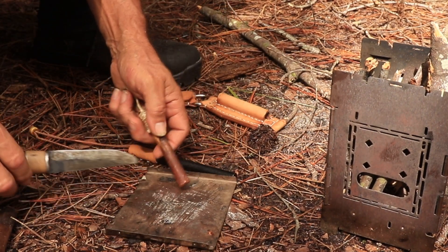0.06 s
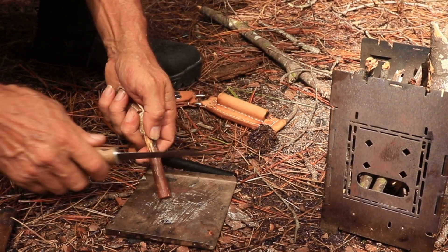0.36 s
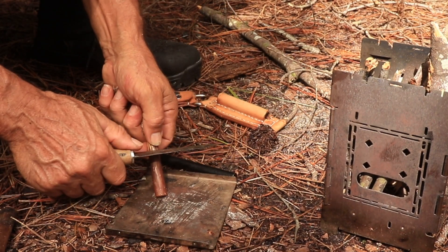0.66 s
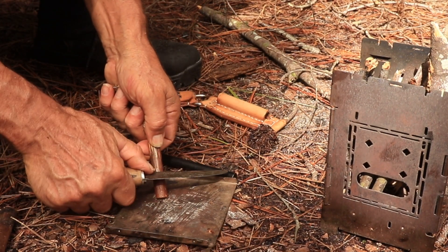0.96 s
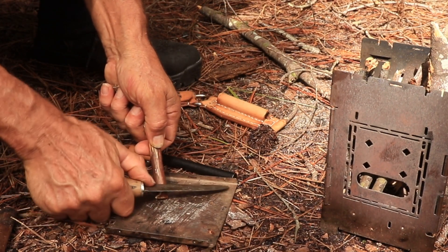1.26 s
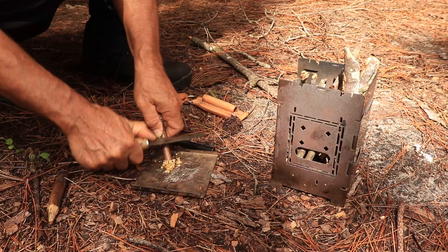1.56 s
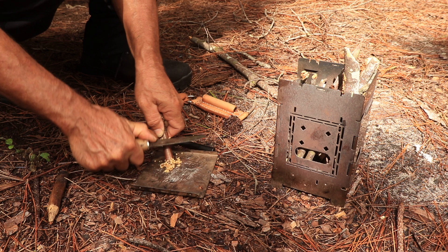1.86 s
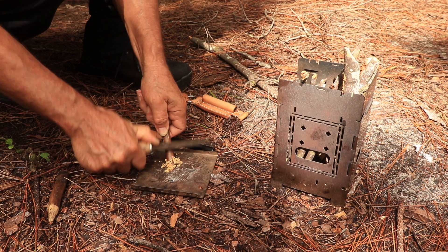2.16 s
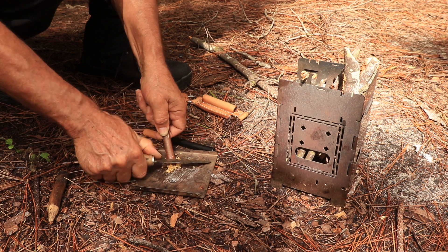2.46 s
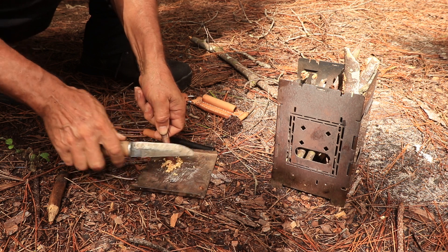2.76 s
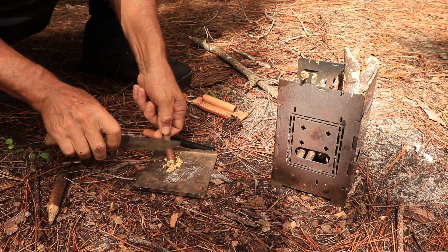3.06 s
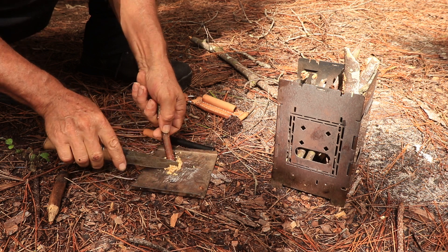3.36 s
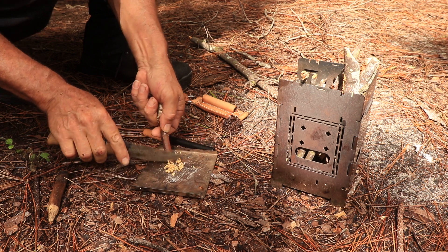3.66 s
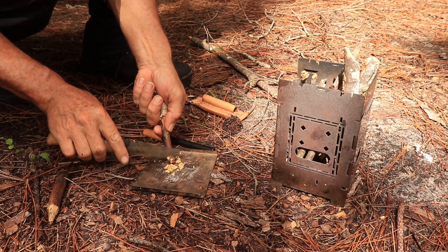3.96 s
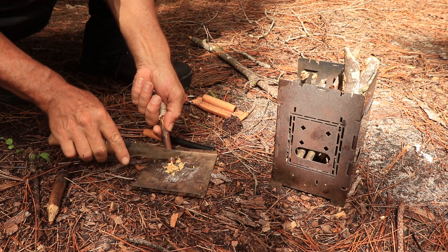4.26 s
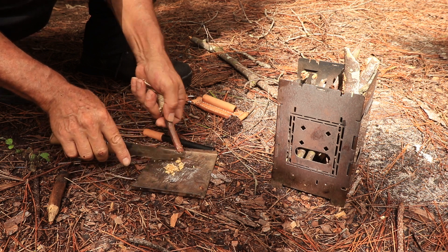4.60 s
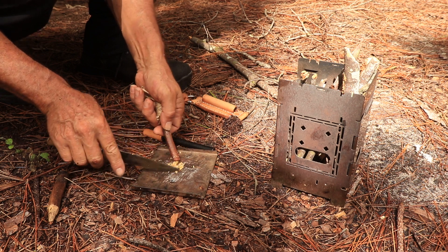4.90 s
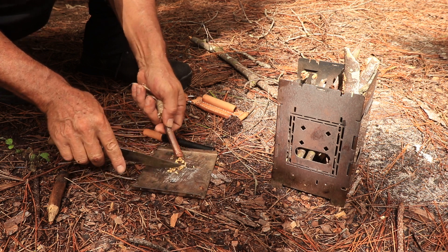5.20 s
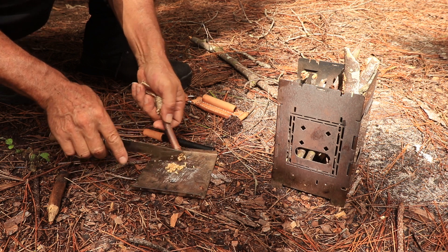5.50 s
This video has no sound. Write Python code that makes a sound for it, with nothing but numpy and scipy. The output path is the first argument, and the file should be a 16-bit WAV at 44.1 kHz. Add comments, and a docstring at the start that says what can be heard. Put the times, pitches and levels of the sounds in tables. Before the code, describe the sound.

Close, chattering knife scrapes and sharp clicks on a metal rod, followed by soft taps and one small clank over faint outdoor air.

```python
"""Shaving a fire-starter rod in the forest

Close to the microphone, a knife works a rod that stands on a steel plate on a quiet forest floor.
The blade rings as it is picked up, then sticks and slips through six hard, chattering strokes, with
light, gritty slides back between them. Afterwards the rod tip taps the plate and pushes the shavings
together. Rod and plate colour every scrape and knock, and the ground thuds softly underneath."""
import sys
import numpy as np
from scipy import signal
from scipy.fft import rfft, irfft, next_fast_len
from scipy.io import wavfile
from scipy.ndimage import uniform_filter1d, minimum_filter1d, map_coordinates

SR = 44100
rng = np.random.default_rng(int(sys.argv[2]) if len(sys.argv) > 2 else 0)


def store_pcm(level_fs):
    """Save levels as 16-bit WAV."""
    pcm = np.round(np.clip(level_fs, -1, 1) * 32767).astype(np.int16)
    wavfile.write(sys.argv[1], SR, np.atleast_2d(pcm).T)


N = 253134


def amp(db):
    """Decibels to gain."""
    return 10 ** (np.asarray(db) / 20)


def unit(x):
    """Scale to rms 1."""
    return x / np.sqrt(np.mean(x ** 2) + 1e-20)


def filtered(x, response):
    """Pass x through a complex response of frequency."""
    size = next_fast_len(len(x) + 8192)
    return irfft(rfft(x, size) * response(np.fft.rfftfreq(size, 1 / SR)), size)[:len(x)]


def noise(spectrum, size=N):
    """Noise of rms 1, coloured by rows of frequency_hz, level_db."""
    knots_hz, db = np.transpose(spectrum)
    colour = lambda hz: amp(np.interp(np.log(hz + 1), np.log(knots_hz), db))
    return unit(filtered(rng.standard_normal(size), colour))


def wobble(rate_hz, size=N):
    """A smooth random curve with rate_hz knots a second."""
    knots = rng.standard_normal(int(size * rate_hz / SR) + 4)
    return map_coordinates(knots, [np.arange(size) * rate_hz / SR])


def resonance(hz, centre, width):
    """Response of one damped mode, 1 at its centre."""
    return 1j * hz * width / (centre ** 2 - hz ** 2 + 1j * hz * width)


def add(track, start_s, sound):
    """Mix a sound into the track at start_s."""
    i = max(round(start_s * SR), 0)
    track[i:i + len(sound)] += sound[:N - i]


# The forest air all around the microphone: frequency_hz, level_db
AIR_SPECTRUM = [(12, -20), (20, -17), (52, -1), (187, -2.5), (310, -5), (499, -6), (698, -9), (976, -9.5),
                (1190, -10), (1660, -12.5), (1810, -11), (2020, -14), (3070, -16.5), (14300, -24.5),
                (16000, -27)]
def forest_air(level_db=-48, waver_db=0.26):
    """Still air among the trees over a faint, even hiss."""
    return amp(level_db + waver_db * wobble(16)) * noise(AIR_SPECTRUM)


def forest_echo(x, near_t60_s=0.081, near_db=-20, far_t60_s=0.39, far_db=-40):
    """The ground and a steel stove nearby add a short echo; trunks farther off, a faint longer one."""
    t = np.arange(SR // 2) / SR
    near, far = (rng.standard_normal(len(t)) * amp(-60 * t / t60_s) * (t > .002)
                 for t60_s in (near_t60_s, far_t60_s))
    tail = amp(near_db) * near / np.linalg.norm(near) + amp(far_db) * far / np.linalg.norm(far)
    return x + signal.fftconvolve(x, tail)[:N]


# The blade ringing as it is picked up or slips free: start_s, level_db
BLADE_TINGS = [(.002, -35), (.045, -35.5), (1.808, -46), (2.33, -53), (2.592, -44)]
# Modes of the free blade: pitch_hz, level_db, t60_s
BLADE_MODES = [(1380, 2, 0.13), (1624, 10, 0.072), (1790, -24, 0.083), (1996, 1, 0.13), (3680, 3, 0.085),
               (3960, -2, 0.14), (4330, 2, 0.14), (4200, -8, 0.17), (4590, -6.5, 0.26), (5250, -8.5, 0.19),
               (5930, -14, 0.29), (6400, -9, 0.14), (7260, -7, 0.15), (7540, -16, .11), (7770, -1.5, 0.17),
               (8000, -7, 0.15), (9440, -3, 0.2), (10000, -13, .12), (12200, -16, .12)]
# The rod tip knocking on the plate: start_s, level_db
PLATE_CLANKS = [(4.9368, -12), (4.9432, -21)]
# Modes of the steel plate: pitch_hz, level_db, t60_s
PLATE_MODES = [(958, 4.5, 0.046), (1510, -7.5, 0.098), (2256, -7, 0.046), (3127, -8, 0.16),
               (3455, -3, 0.035), (4130, -11.5, 0.14), (6460, -15.5, 0.13), (7600, -35, 0.22),
               (8560, -21, 0.11), (9600, -30, 0.1)]
def ringing_steel(blows, modes):
    """Free steel rings in its own modes, at new strengths for each blow."""
    out, t = np.zeros(N), np.arange(SR // 3) / SR
    attack = 1 - np.exp(-t / 0.00027)
    for start_s, db in blows:
        ring = sum(amp(mode_db + rng.normal(0, 2.7) - 60 * t / t60_s)
                   * np.sin(2 * np.pi * (hz * t + rng.random())) for hz, mode_db, t60_s in modes)
        add(out, start_s, amp(db) * ring * attack)
    return out


# Modes of rod and plate held together: pitch_hz, width_hz, level_db
ROD_MODES = [(676, 57, 2.5), (920, 24, -3), (1118, 140, -11), (1206, 56, 1), (1283.4, 40, 1),
             (1440, 53, -7.5), (1636, 65, -5), (1853, 70, 2.5), (2115, 18, -17), (2440, 130, -4.5),
             (2565, 90, -2.5), (2710, 100, -9), (3090, 41, -13), (3240, 280, -5.5), (3710, 28, -2),
             (4300, 92, -20), (4286, 114, 0), (4300, 50, -35)]
def rod_body(force, direct, low_hz=750, high_hz=4500):
    """A force heard through the modes of rod and plate, plus a direct share, within a steep-edged band."""
    def response(hz):
        modes = sum(amp(db) * resonance(hz, centre, width) for centre, width, db in ROD_MODES)
        highpass = signal.freqs(*signal.butter(4, 1, 'high', analog=True), hz / low_hz)[1]
        lowpass = signal.freqs(*signal.butter(4, 1, 'low', analog=True), hz / high_hz)[1]
        return (direct + modes) * highpass * lowpass
    return filtered(force, response)


# Treble modes of the gripped blade: pitch_hz, width_hz, level_db
EDGE_MODES = [(3150, 61, -3), (3600, 59, -11), (4360, 194, 9), (5760, 160, -1), (6120, 260, -0.5),
              (6950, 260, -5.5), (7650, 64, 5), (8300, 220, -1.5), (9500, 310, -3.5), (10870, 410, -3)]
def blade_edge(friction, direct=0.5):
    """Fine friction coloured by the blade's treble resonances."""
    modes = lambda hz: sum(amp(db) * resonance(hz, centre, width) for centre, width, db in EDGE_MODES)
    return filtered(friction, lambda hz: direct + modes(hz))


# The forest floor thudding under the plate: frequency_hz, level_db
THUD_SPECTRUM = [(30, -16), (70, -11.5), (130, -1), (190, -3.5), (300, -5), (550, -7), (900, -8),
                 (2000, -57)]
# Blade, rod and plate knocking together at close range: start_s, level_db, tone_hz, treble_db
CONTACTS = [ (0.465, -43.5, 1030, -38), (0.686, -32.5, 2000, -20), (0.7271, -36.5, 1110, -35),
            (0.8135, -52.5, 3980, -2), (0.9999, -17, 2640, -13), (1.1949, -9.5, 1737, -18.5),
            (1.3068, -15.5, 1860, -16.5), (1.3808, -41.5, 1560, -11), (1.4304, -47, 2980, -0.5),
            (1.5852, -38, 1250, -13), (1.652, -41, 1570, -8), (1.7271, -8.5, 1080, -12),
            (1.755, -14, 1010, -40), (1.8064, -10.5, 1620, -4), (1.8604, -35, 1470, -13),
            (2.327, -3.5, 1770, -4.5), (2.3943, -30, 1400, -27), (2.590, -8, 1700, -6),
            (3.034, -48, 3780, -3), (3.1013, -30, 1070, -18.5), (3.6573, -21.5, 1850, -24),
            (3.6591, -29.5, 1065, -34), (3.757, -42, 1230, -22), (4.0061, -26.5, 1320, -29),
            (4.005, -41, 2350, -34), (4.3744, -25, 1500, -30), (4.565, -52.5, 2600, -6),
            (4.622, -51, 1990, -2), (4.9371, -18.5, 1210, -9.5), (4.9443, -18.5, 2860, -11),
            (5.1316, -38.5, 1225, -28), (5.2074, -47.5, 1440, -5.5), (5.5644, -37.5, 4430, -26),
            (5.564, -38, 1720, -29)]
def taps(rattle_cycles=40.7, ring_t60_s=0.051, tick_t60_s=0.021, thud_t60_s=0.1, thud_db=-24):
    """A contact cracks, rattles and ticks over a soft thud; the modes nearest its tone ring on."""
    out, t = np.zeros(N), np.arange(SR // 7) / SR
    decay = lambda t60_s: amp(-60 * t / t60_s)
    levelled = lambda x: x / np.sqrt(np.sum(x ** 2) / (SR / 100))  # the energy of 10 ms at rms 1
    for start_s, db, tone_hz, treble_db in CONTACTS:
        rattle = rng.standard_normal(len(t)) * decay(rattle_cycles / tone_hz)
        rattle[0] += 8  # the opening crack
        contact = lambda hz: (resonance(hz, tone_hz, width=0.49 * tone_hz)
                              * resonance(hz, 0.73 * tone_hz, width=1.64 * tone_hz))
        knock = levelled(rod_body(filtered(rattle, contact), direct=0.69))
        modes = sum(amp(mode_db / 2 + rng.normal(0, 0.59))
                    * np.abs(resonance(hz, tone_hz, width=0.063 * tone_hz)) ** 2
                    * np.sin(2 * np.pi * (hz * t + rng.random())) for hz, _, mode_db in ROD_MODES)
        ring_db = -17 * np.log2(tone_hz / 1126)  # higher contacts ring less
        ring = amp(ring_db) * levelled(modes * decay(ring_t60_s))
        cutoff_hz = 22000 * amp(0.8 * treble_db)  # softer contacts lose the top
        snap = rng.standard_normal(len(t)) * decay(tick_t60_s)
        snap = filtered(snap, lambda hz: resonance(hz, 5860, 7200) / (1 + 1j * hz / cutoff_hz) ** 2)
        tick = amp(treble_db) * levelled(blade_edge(snap))
        thud = amp(thud_db) * noise(THUD_SPECTRUM, len(t)) * decay(thud_t60_s)
        add(out, start_s, amp(db) * (knock + ring + tick + thud))
    return out


# The coarse rasp of grit under the blade: frequency_hz, level_db
RASP_SPECTRUM = [(300, -3.5), (800, -21.5), (1200, -4), (1900, 4), (2700, -2), (4200, -2.5), (5100, -29),
                 (8000, -38)]
# The fine hiss of that grit, heard from close by: frequency_hz, level_db
HISS_SPECTRUM = [(1800, -14), (3000, 8), (4350, -6.5), (5100, -2.5), (5900, 2.5), (6700, -3.5), (7800, -2),
                 (9000, -2.5), (10000, -11), (11200, -11.5), (13000, -13), (16000, -22)]
# Metal sliding on metal, one row a movement of the hand: start_s, end_s, level_db, hiss_db
HAND_SLIDES = [ (-.03, 0.06, -28, -36), (.907, 0.932, -35, -54), (0.93, 1.028, -26.5, -36),
               (1.131, 1.154, -40, -65), (1.24, 1.358, -23.5, -30.5), (1.438, 1.545, -31.5, -48.5),
               (1.593, 1.659, -29.5, -44.5), (1.678, 1.751, -23.5, -48), (1.744, 1.814, -17, -25.5),
               (1.852, 1.906, -35.5, -52), (1.902, 1.956, -30.5, -44), (1.977, 2.074, -20.5, -24),
               (2.15, 2.226, -30.5, -49), (2.243, 2.348, -20, -23.5), (2.393, 2.476, -29.5, -43),
               (2.486, 2.605, -25, -35.5), (2.615, 2.638, -36.5, -37.5), (3.701, 3.737, -41.5, -52),
               (4.042, 4.187, -37.5, -53.5), (4.386, 4.449, -42, -53), (4.936, 4.998, -31.5, -37)]
def slides(grit_db=4.0, grit_rate_hz=1600, dull_hz=2300, firm_db=-29, push_db=-19.5, direct=0.32):
    """Grit rasps and hisses as each slide speeds up and slows; the push thuds into the ground."""
    t = np.arange(N) / SR
    rasp_gain, hiss_gain, thud_gain = np.zeros((3, N))
    for start_s, end_s, db, hiss_db in HAND_SLIDES:
        moving = (t > start_s) & (t < end_s)
        speed = np.abs(np.sin(np.pi * (t[moving] - start_s) / (end_s - start_s)))
        rasp_gain[moving] += amp(db) * speed ** 0.77
        hiss_gain[moving] += amp(hiss_db) * speed ** 1.94
        thud_gain[moving] += amp(push_db + 0.96 * db) * speed ** 0.5
    pressure_db = 1.1 * wobble(110)
    grit = unit(amp(grit_db * wobble(grit_rate_hz) + pressure_db))
    sharp = grit * noise(RASP_SPECTRUM)
    # a light touch excites only the low modes
    dull = unit(filtered(grit * noise(RASP_SPECTRUM), lambda hz: 1 / (1 + (hz / dull_hz) ** 4)))
    firmness = rasp_gain ** 2 / (rasp_gain ** 2 + amp(firm_db) ** 2)
    friction = np.sqrt(firmness) * sharp + np.sqrt(1 - firmness) * dull
    rasp = rod_body(rasp_gain * friction, direct) / np.std(rod_body(sharp, direct))
    hiss = hiss_gain * unit(blade_edge(grit * noise(HISS_SPECTRUM)))
    return rasp + hiss + thud_gain * noise(THUD_SPECTRUM)


# The edge biting into the rod, close to the microphone; change_db builds up across the bite:
# start_s, end_s, top_pitch_hz, level_db, change_db
EDGE_BITES = [ (0.976, 0.997, 1750, -16, -0.5), (1.003, 1.032, 1272, -18, -12.5),
              (1.305, 1.344, 1648, -11, -2.5), (1.688, 1.713, 2298, -15, 13), (1.715, 1.744, 1491, -1, -3),
              (1.751, 1.813, 2500, -12, 1.5), (1.985, 2.023, 2492, -16.5, 18),
              (2.016, 2.064, 2520, -4, -2.5), (2.264, 2.323, 4220, -5, -5),
              (2.499, 2.565, 2670, -10.5, -15.5), (2.573, 2.589, 1450, -21, -8)]
def chatter(slow_hz=1288, fade_db_per_octave=4.5, ramp_s=0.0045, overtone_db=-17, spit_db=-29):
    """The edge sticks and slips; its squawk glides to top_pitch_hz and back as it speeds up and slows."""
    out, t = np.zeros(N), np.arange(SR // 4) / SR
    for start_s, end_s, top_pitch_hz, db, change_db in EDGE_BITES:
        length_s = end_s - start_s
        progress = np.minimum(t / length_s, 1)
        speed = np.abs(np.sin(np.pi * progress)) ** 2.1
        octaves = speed * np.log2(top_pitch_hz / slow_hz)
        jitter = np.exp(0.1677 * wobble(1700, len(t)))
        slip_hz = slow_hz * 2 ** octaves * jitter
        phase = 2 * np.pi * np.cumsum(slip_hz) / SR
        grip = np.clip(np.minimum(t, length_s - t) / ramp_s, 0, 1)
        force = grip * amp(db + change_db * progress - fade_db_per_octave * octaves)
        uneven_db = 3 * wobble(492.5, len(t)) + 1.1 * wobble(130, len(t))  # flutter and slower catches
        slips = (np.sin(phase) + amp(overtone_db) * np.sin(2 * phase)) * amp(uneven_db)
        squawk = rod_body(force * slips, direct=0.37)
        squawk *= np.linalg.norm(force) / np.linalg.norm(squawk)
        torn_grit = unit(blade_edge(noise(HISS_SPECTRUM, len(t))))
        spit = force * amp(uneven_db + spit_db) * torn_grit
        add(out, start_s, squawk + spit)
    return out


def scene():
    """Knife, rod and plate close to one microphone, with the quiet forest behind them."""
    steel = ringing_steel(BLADE_TINGS, BLADE_MODES) + ringing_steel(PLATE_CLANKS, PLATE_MODES)
    close_sounds = chatter() + slides() + taps() + steel
    return (forest_echo(close_sounds) + forest_air())[None]


def record(dry, ceiling=0.72, top_hz=16100):
    """A fast limiter after the microphone holds the loudest peaks; nothing is kept above top_hz."""
    needed_gain = np.minimum(1, ceiling / (np.abs(dry[0]) + 1e-9))
    gain = uniform_filter1d(minimum_filter1d(needed_gain, size=25), size=25)
    return filtered(dry[0] * gain, lambda hz: hz < top_hz)[None]


dry = scene()
out = record(dry)
store_pcm(out)
```